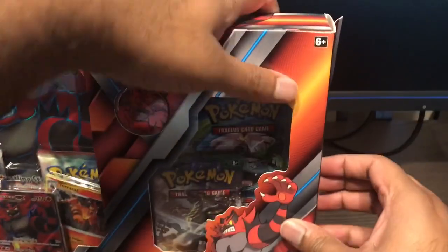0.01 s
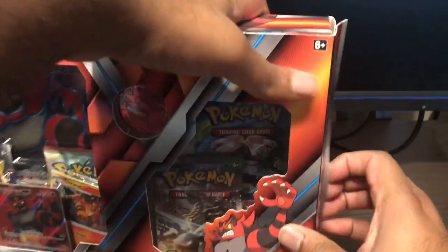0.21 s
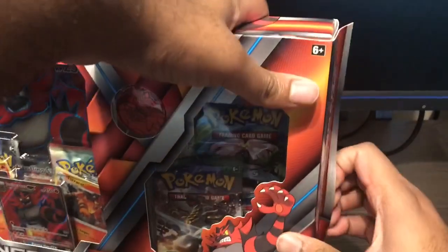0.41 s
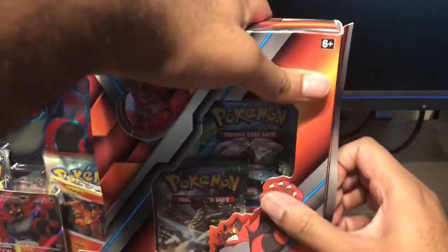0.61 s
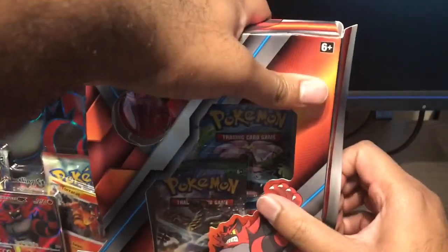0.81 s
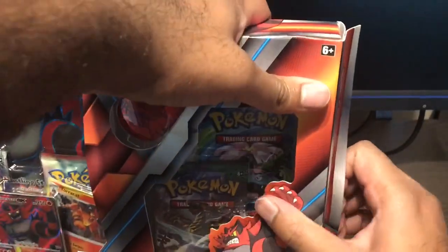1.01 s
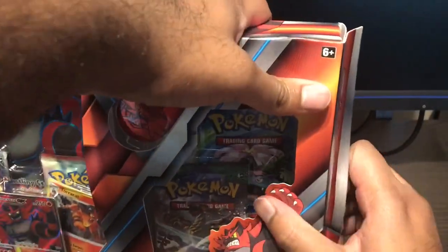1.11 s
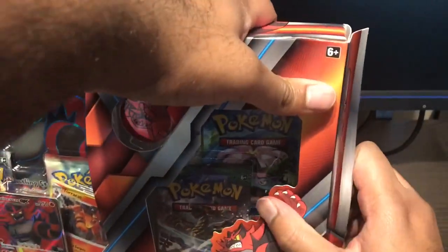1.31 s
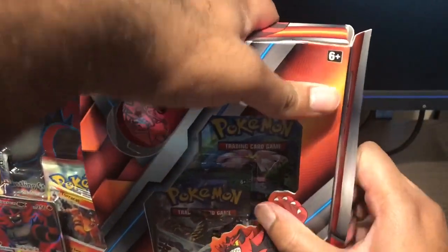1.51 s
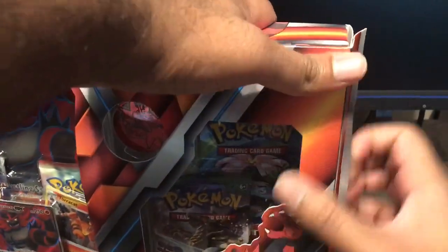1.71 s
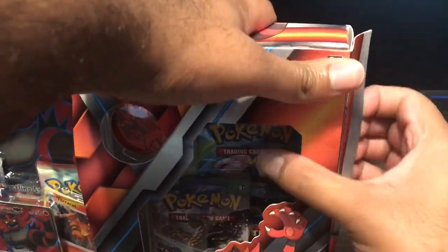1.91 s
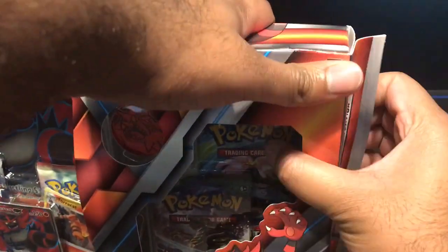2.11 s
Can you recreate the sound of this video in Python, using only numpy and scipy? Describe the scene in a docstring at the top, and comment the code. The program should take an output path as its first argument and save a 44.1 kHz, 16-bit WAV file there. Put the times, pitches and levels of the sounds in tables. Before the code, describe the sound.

A glued thin cardboard flap tears open in a quick jerky rip, followed by skin hissing on card, sharp glue snaps and board knocks, then quieter rustles and light knocks, close to a phone in a quiet room.

```python
"""Hands open the glued flap of a thin cardboard box, close to a phone in a quiet room, for 2.2 s.
After a faint rustle the flap rips loose in jerks (0.22 to 0.42 s): bursts of slips ring the box walls.
Skin then hisses over the card, glue spots snap as bursts of noise, the sharpest at 0.9 s, and the board knocks.
From 1.3 s it is quieter, with rustles from many tiny slips, rough scuffs and, near the end, a run of knocks.
Low noise thuds along underneath, and soft steady noise makes the air of the room."""
import sys
import numpy as np
from scipy import signal
from scipy.fft import rfft, irfft, next_fast_len
from scipy.io import wavfile
from scipy.ndimage import uniform_filter1d

SR = 44100
rng = np.random.default_rng(int(sys.argv[2]) if len(sys.argv) > 2 else 0)


def wav_out(sig):
    """Save sig, one row per channel (or a flat mono array), as 16-bit PCM at SR to the path in sys.argv[1]."""
    wavfile.write(sys.argv[1], SR, np.round(np.clip(np.atleast_2d(sig).T, -1, 1) * 32767).astype(np.int16))


def makeup_ratio(level_db):
    """Linear amplitude ratio for a level in decibels (20 dB per factor of ten)."""
    decades = np.asarray(level_db, float) / 20
    return 10 ** decades


N = 97020  # length in samples

# Spectrum of the room's air noise: f/Hz, level/dB
AIR_SPECTRUM = [(40, 8), (195, 4), (1560, -17), (16500, -45)]
# Spectrum of the low thudding: f/Hz, level/dB
RUMBLE_SPECTRUM = [(30, 6), (80, -6), (190, -1), (270, -15), (500, -59)]
# Low thudding of the handled box over time: t/s, level/dB
RUMBLE_LEVELS = [(0, -45.5), (.2, -55.5), (.28, -46), (.43, -34.5), (.5, -60), (.6, -50), (.73, -35.5),
                 (.85, -50.5), (.95, -53), (1.05, -57), (1.18, -45), (1.45, -54), (1.9, -55), (2.2, -43.5)]
# Spectrum of skin hissing over card: f/Hz, level/dB
SKIN_SPECTRUM = [(300, -80), (800, -2), (1900, 0), (4500, -2.5), (7000, -4.5), (11000, -8.5), (15500, -7),
                 (16500, -38)]
# Skin sliding on the printed face over time: t/s, level/dB, brightness/dB (added above, taken off below)
SLIDE_LEVELS = [(0, -52, -2), (.045, -49.5, -0.5), (.11, -61, -3), (.22, -63, 0), (.27, -36.5, -5),
                (.41, -45, -4.5), (.47, -63.5, -11), (.56, -63, -0.5), (.61, -36, -0.5), (.65, -28.5, -2.5),
                (.69, -31, -0.5), (.705, -36.5, -6.5), (.77, -58.5, -2), (.93, -62.5, 6), (1.03, -61.5, 7),
                (1.1, -72, 3), (1.25, -57, -5.5), (1.45, -69, 4), (1.6, -67, 3), (1.69, -47.5, -2),
                (1.85, -49.5, 4.5), (1.93, -49, 0.5), (1.98, -75, 8), (2.04, -59, 4.5), (2.2, -55.5, 5.5)]
# Board flexing under the fingers over time: t/s, level/dB, brightness/dB (added above, taken off below)
FLEX_LEVELS = [(0, -48, -2.5), (.12, -66.5, -2), (.21, -54, 3), (.235, -33, -4.5), (.32, -31.5, 10),
               (.335, -27, 1.5), (.39, -28, -1), (.435, -28, -6), (.46, -48, -6), (.56, -48.5, 0.5),
               (.72, -39.5, -6.5), (.78, -42.5, 1), (.89, -76, -25), (.97, -51, -3.5), (1.09, -61.5, -0.5),
               (1.16, -43, 1.5), (1.26, -44.5, 0), (1.31, -46, -0.5), (1.44, -54, 1.5), (1.48, -44.5, 2.5),
               (1.55, -68, -6), (1.6, -65, 11.5), (1.65, -53.5, 3), (1.69, -44.5, 1.5), (1.76, -55.5, -9),
               (1.82, -55, -0.5), (1.93, -54.5, 2.5), (2.03, -47.5, 1.5), (2.2, -64.5, 6)]
# Ringing modes of the box walls: f/Hz, level/dB, time to fall by 60 dB when no hand damps it/s
BOX_MODES = [(160.4, -3.5, 0.21), (171, -5.5, 0.15), (245.7, -0.5, 0.12), (351.1, -0.5, 0.15),
             (438.9, -0.5, 0.051), (545.6, -9, 0.098), (674, -9, 0.035), (749, 0.5, 0.074),
             (900, 0.5, 0.03), (1169, 7.5, 0.02), (1574, 8, 0.019), (1900, 1.5, 0.039), (2244, 5.5, 0.018),
             (2665, 8, 0.018), (3550, 11.5, 0.0071), (4000, -3, 0.05)]
# Rough scuffs of a card edge: t/s, peak level/dB, centre f/Hz
SCUFFS = [(1.627, -30.5, 2800), (1.662, -31.5, 1150), (1.727, -25, 1550), (2.015, -32, 2530),
          (2.087, -33, 1200)]
# Knocks and pops of the board: t/s, peak level/dB, centre f/Hz
KNOCKS = [(.44, -23.5, 325), (0.698, -15.5, 1150), (.699, -21, 394), (0.803, -26, 970), (.885, -32.5, 1220),
          (0.947, -12.5, 1140), (1.176, -9.5, 1350), (1.269, -25, 2950), (1.483, -30.5, 3000),
          (1.604, -31, 730), (1.7657, -26, 900), (1.969, -27.5, 1590), (2, -30.5, 1900),
          (2.0792, -27.5, 930), (2.083, -22, 980), (2.1, -35, 2170), (2.133, -18.5, 900), (2.177, -17, 900)]
# Spectrum of breaking fibres: f/Hz, level/dB
SNAP_SPECTRUM = [(290, -42), (500, -1), (2850, 3.5), (3930, -3), (7600, -5), (10200, -7.5), (13200, 1),
                 (16500, -15)]
# Glue spots snapping: t/s, peak level/dB, lowest f/Hz
GLUE_SNAPS = [(0.698, -16, 2790), (0.727, -27.5, 3000), (0.781, -15.5, 4000), (0.854, -30.5, 5800),
              (.899, -35, 8040), (0.904, -3.5, 1100), (1.014, -23.5, 8160), (1.271, -46, 3500),
              (1.279, -46, 4000), (1.511, -28.5, 8950), (1.63, -33.5, 4000), (2.037, -30.5, 2500),
              (2.185, -26.5, 3800)]
# Jerks of the ripping flap: t/s, peak level/dB, peak level of the snap/dB
JERKS = [(0.2195, -24, -27.5), (0.247, -8.5, -13.5), (0.2629, -11, -30), (0.2761, -9, -22),
         (0.283, -10.5, -21), (0.2931, -10, -15.5), (0.3002, -11, -21), (.313, -9, -16),
         (0.325, -18.5, -21.5), (0.333, -23.5, -17), (0.349, -16.5, -19), (0.386, -38, -21.5),
         (0.402, -17.5, -40), (0.421, -24, -29)]

AIR_DB = -55
ROOM_DB, ROOM_T60_S = -20.5, 0.35
# Share of the ring time left by the gripping hand
KNOCK_DAMP, JERK_DAMP, FLEX_DAMP = 0.51, 0.43, 0.4
LATE_S = 0.003  # lag of a 400 Hz wave through the board
MODE_SCATTER_DB, DETUNE = 2.0, 0.03  # random spread of mode levels, and of pitches as a share
GRIT_HZ, GRIT_DB = 3160, -15
JERK_S, JERK_HZ, JERK_OCT = 0.0025, 960, 2.7
SCUFF_S, KNOCK_OCT = 0.0068, 1.15
CONTACT_CYCLES = 0.13  # width of a blow in cycles of its centre pitch
SNAP_S, TAIL_DB, TAIL_S = 0.0019, -24.5, 0.044
DRUM_HZ, DRUM_DB = 240, -9  # boom of the big face, against the peak of its jerk
BOARD_LOW_HZ = 128  # a small box radiates little below this
BASS_CUT_HZ, TOP_HZ = 40, 16300


def unit(x):
    """Scales a sound to an rms of 1."""
    return x / np.sqrt(np.mean(x ** 2) + 1e-18)


def curve(rows, col):
    """Draws straight lines through one column of a table whose first column is time."""
    rows = np.array(rows)
    return np.interp(np.arange(N) / SR, rows[:, 0], rows[:, col])


def butter(x, order, hz, kind):
    """Filters a sound with a smooth Butterworth cut."""
    return signal.sosfilt(signal.butter(order, hz, kind, fs=SR, output="sos"), x)


def colour(x, points):
    """Shapes the spectrum along (Hz, dB) points, joined on a log pitch scale."""
    points, size = np.array(points), next_fast_len(len(x))
    hz = np.maximum(np.arange(size // 2 + 1) * SR / size, 1)
    gain_db = np.interp(np.log(hz), np.log(points[:, 0]), points[:, 1])
    return irfft(rfft(x, size) * makeup_ratio(gain_db), size)[:len(x)]


def tilted(x, slope_db, hz):
    """Splits a sound at hz and weighs the two parts by a moving slope."""
    low = butter(x, 2, hz, "low")
    high = x - low
    return low * makeup_ratio(-slope_db) + high * makeup_ratio(slope_db)


def walk(rate):
    """Makes random levels, each held for 1 / rate seconds and then smoothed."""
    hold = int(SR / rate)
    steps = np.repeat(rng.standard_normal(N // hold + 1), hold)
    return uniform_filter1d(steps, hold)[:N]


def grains(rate, spread_db):
    """Scatters clicks of uneven size and random sign, about rate per second."""
    chance, size = rng.random((2, N))
    hit = chance < rate / SR
    sign = np.sign(chance * SR / rate - 0.5)  # half of the hits fall on each side
    return hit * makeup_ratio(-spread_db * np.log(1 - 0.98 * size)) * sign


def add(out, s, x, db):
    """Adds x to out at s seconds, scaled to the given peak level."""
    i = int(s * SR)
    x = x[:N - i]
    out[i:i + len(x)] += x * makeup_ratio(db) / np.abs(x).max()


def ring(hz, octaves, damp, turn=-1.0):
    """Rings the box struck at a new spot: modes near hz lead and the low ones come late.

    turn sets each mode's sign and size against the one before: -1 flips it, 1 starts all in step."""
    f, db, t60 = np.array(BOX_MODES).T[:, :, None]
    scatter, detune = rng.standard_normal((2, len(BOX_MODES), 1))
    lag = LATE_S * np.minimum(400 / f, 1.5) ** 3
    t = np.maximum(np.arange(4410) / SR - lag, 0)
    nearness = np.exp(-0.5 * (np.log2(f / hz) / octaves) ** 2)
    gain = turn ** np.arange(len(BOX_MODES))[:, None] * makeup_ratio(db + MODE_SCATTER_DB * scatter) * nearness
    decay = np.exp(-np.log(1000) * t / t60 / damp)
    return (gain * decay * np.sin(2 * np.pi * f * (1 + DETUNE * detune) * t)).sum(axis=0)


def push(s):
    """Makes a rough shove of random slips that swells and dies away on a time scale of s seconds."""
    chance, size = rng.random((2, 882))
    t = np.arange(882) / SR / s
    return (chance < 0.15) * (size - 0.5) * (t + 0.1) * np.exp(-2 * t)


def bump(hz):
    """Makes one smooth blow, heard as push and recoil; a lower knock is a longer contact."""
    width = CONTACT_CYCLES * SR / hz
    press = np.exp(-0.5 * (np.arange(-3 * width, 3 * width) / width) ** 2)
    return np.diff(press)


def snap(low_hz, decay_s):
    """Makes a bright noise burst of breaking fibres with a fizzing tail."""
    t = np.arange(4410) / SR
    fibres = butter(colour(rng.standard_normal(len(t)), SNAP_SPECTRUM), 2, low_hz, "high")
    fade = np.exp(-t / decay_s) + makeup_ratio(TAIL_DB) * np.exp(-t / TAIL_S)
    return fibres * fade * np.minimum(t / 0.0001, 1)  # rises in 0.1 ms


def air():
    """Makes the steady, mostly low noise of the room's air."""
    return unit(colour(rng.standard_normal(N), AIR_SPECTRUM)) * makeup_ratio(AIR_DB)


def room(near):
    """Echoes the near sounds with a fading noise tail that loses treble, as a room's many reflections do."""
    t = np.arange(SR // 3) / SR
    echoes = colour(rng.standard_normal(len(t)), [(100, -1.5), (2000, -12.5), (16000, -44)])
    echoes = echoes * np.exp(-np.log(1000) * t / ROOM_T60_S) * (t > 0.004)  # 4 ms before the first echo
    wet = signal.fftconvolve(near, echoes / np.sqrt(np.sum(echoes ** 2)))[:N]
    return makeup_ratio(ROOM_DB) * wet


def rumble():
    """Thuds softly, as the handled box does: low noise with a wandering level."""
    thud = unit(colour(rng.standard_normal(N), RUMBLE_SPECTRUM))
    return thud * makeup_ratio(curve(RUMBLE_LEVELS, 1) + 1.55 * walk(7.4))


def slide():
    """Hisses as skin rubs over the card: noise and tiny grains, uneven in level."""
    rub = rng.standard_normal(N) + 0.5 * unit(grains(1500, 3.1))
    hiss = unit(colour(rub, SKIN_SPECTRUM))
    return tilted(hiss, curve(SLIDE_LEVELS, 2), 5200) * makeup_ratio(curve(SLIDE_LEVELS, 1) + 2.7 * walk(73))


def flex(count=12):
    """Rustles the flexing board: dense tiny slips ring the box at changing spots and scratch too."""
    slips = unit(grains(2500, 0.87))
    spot = np.repeat(rng.integers(0, count, N // 256 + 1), 256)[:N]
    body = np.zeros(N)
    for k in range(count):
        body += signal.fftconvolve(slips * (spot == k), ring(746, 1.57, FLEX_DAMP))[:N]
    grit = butter(slips, 2, [GRIT_HZ / 2, GRIT_HZ * 2.14], "band")
    rustle = unit(body) + makeup_ratio(GRIT_DB) * unit(grit)
    return tilted(rustle, curve(FLEX_LEVELS, 2), 1080) * makeup_ratio(curve(FLEX_LEVELS, 1) + 1.5 * walk(59.68))


def scuffs():
    """Scrapes a card edge: longer rough shoves ring the box."""
    out = np.zeros(N)
    for s, db, hz in SCUFFS:
        add(out, s, signal.fftconvolve(push(SCUFF_S), ring(hz, KNOCK_OCT, JERK_DAMP)), db)
    return out


def knocks():
    """Knocks the board: smooth blows start the box modes in step, each a little weaker than the last."""
    out = np.zeros(N)
    for s, db, hz in KNOCKS:
        add(out, s, signal.fftconvolve(bump(hz), ring(hz, KNOCK_OCT, KNOCK_DAMP, 0.96)), db)
    return out


def glue_snaps():
    """Snaps the glue spots, each a short burst of breaking fibres."""
    out = np.zeros(N)
    for s, db, low_hz in GLUE_SNAPS:
        add(out, s, snap(low_hz, SNAP_S), db)
    return out


def flap_jerks():
    """Rips the flap by stick and slip: each jerk shoves the box, snaps fibres and booms the big face."""
    out = np.zeros(N)
    for s, db, snap_db in JERKS:
        add(out, s, signal.fftconvolve(push(JERK_S), ring(JERK_HZ, JERK_OCT, JERK_DAMP)), db)
        add(out, s, snap(2200, 0.0014), snap_db)
        add(out, s, ring(DRUM_HZ, 0.276, 1.0), db + DRUM_DB)
    return out


def scene():
    """Mixes the board sounds, sliding skin and rumble, then adds room echoes and air."""
    board = flex() + scuffs() + knocks() + glue_snaps() + flap_jerks()
    near = butter(board, 2, BOARD_LOW_HZ, "high") + slide() + rumble()
    return (near + room(near) + air())[None]


def low_pass(x):
    """Removes everything above the highest recorded frequency."""
    return signal.sosfilt(signal.butter(12, 16810, fs=SR, output="sos"), x)


def record(dry):
    """Cuts the deep bass and the top of the treble, as the phone does."""
    no_bass = butter(dry, 3, BASS_CUT_HZ, "high")
    top_cut = signal.ellip(8, 0.2, 60, TOP_HZ, fs=SR, output="sos")
    mix = signal.sosfilt(top_cut, no_bass)
    return low_pass(mix)


dry = scene()
out = record(dry)
wav_out(out)
```